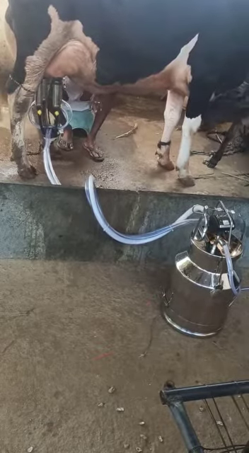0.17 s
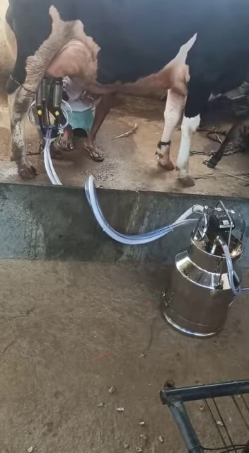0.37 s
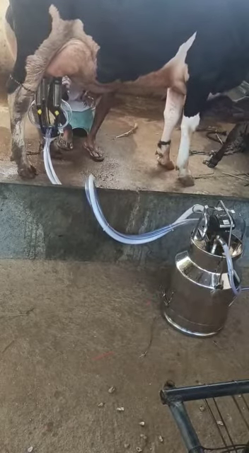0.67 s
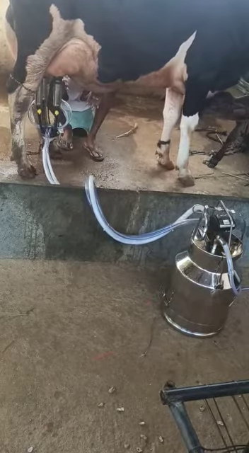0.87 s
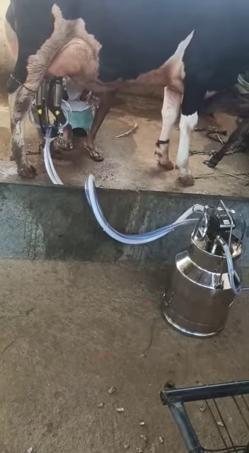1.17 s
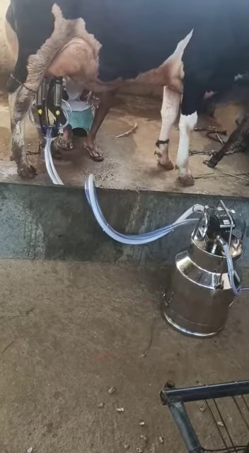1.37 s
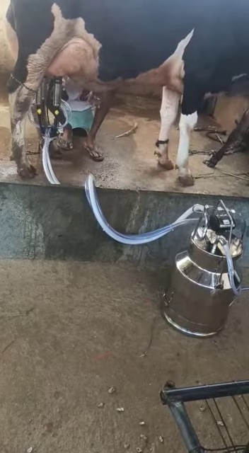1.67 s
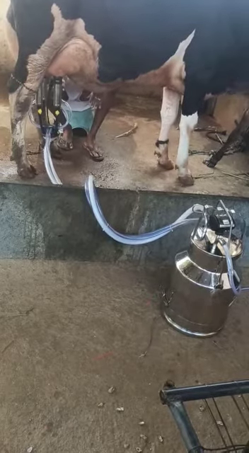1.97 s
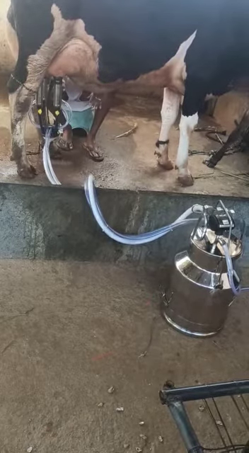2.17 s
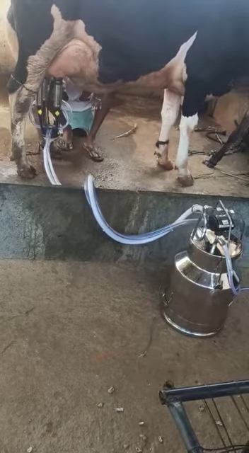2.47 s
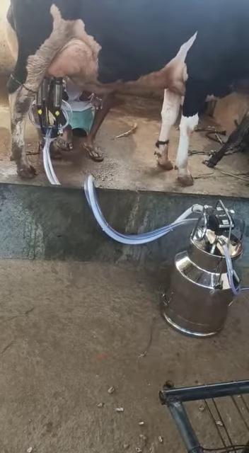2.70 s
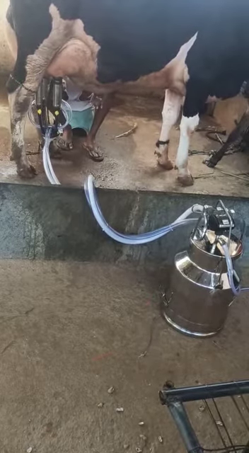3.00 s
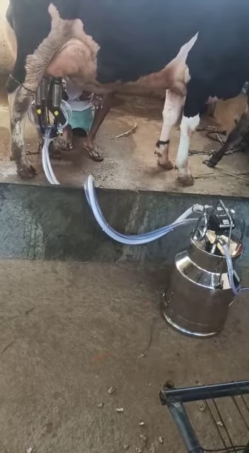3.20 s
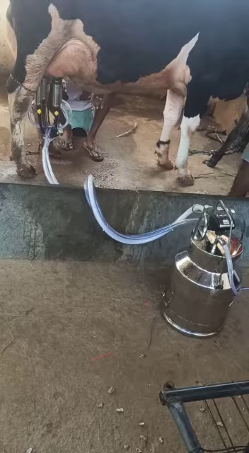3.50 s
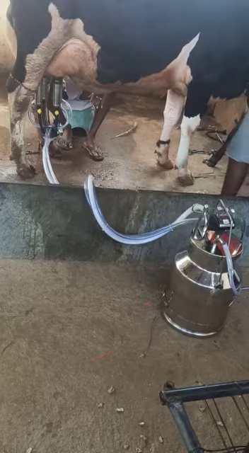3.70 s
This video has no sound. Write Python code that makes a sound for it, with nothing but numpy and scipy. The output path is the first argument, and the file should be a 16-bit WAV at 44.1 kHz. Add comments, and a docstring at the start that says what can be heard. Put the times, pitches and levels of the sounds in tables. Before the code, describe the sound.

Milking machine at work: constant vacuum pump drone, sharp alternating valve clicks, soft puffs of air.

```python
"""A barn: a milking machine works beside a cow. Its vane vacuum pump hums and buzzes at a constant speed:
tones on multiples of the shaft speed, bearing whine and a rush of noise that pulses with the vanes.
The pulsator on the bucket snaps over and back, tick and tock: shaped noise bursts and decaying sines.
Each snap lets a puff of air through the valve, and a longer hiss swells about a third of a second later.
The concrete floor throws every snap back at once, and the barn adds a short tail."""
import sys
import numpy as np
from scipy import signal
from scipy.fft import rfft, irfft, next_fast_len
from scipy.io import wavfile
from scipy.ndimage import uniform_filter1d

SR = 44100
rng = np.random.default_rng(int(sys.argv[2]) if len(sys.argv) > 2 else 0)


def wrap_up_sound(samples):
    """Save the sound to the file named by the first command line argument, as 16-bit audio."""
    columns = np.atleast_2d(samples).T
    # keep every value between -1 and 1, then stretch to whole-number steps
    tamed = np.clip(columns, -1, 1)
    steps = np.round(tamed * 32767).astype(np.int16)
    wavfile.write(sys.argv[1], SR, steps)


N = 169785
TOP_HZ = 15600  # band limit

# valve snaps over: start_s, level_db
TICKS = [(.3226, 1), (1.4736, 1.5), (2.6146, 1), (3.7656, 0.5)]
# valve snaps back: start_s, level_db
TOCKS = [(-.19, 0.0047), (.9575, 0), (2.0982, 0), (3.2497, 0.028)]
# stereo lean of noise, and mean lean of weak tones: freq_hz, left_minus_right_db
LEAN_BY_HZ = [(300, -2), (520, -1), (800, -3.5), (3000, -0.5), (8000, 0.5), (13000, -3.5)]


def amp(db):
    """Decibels to gain."""
    return 10 ** (np.asarray(db) / 20)


def unit(x):
    """Scale to rms 1."""
    return x / np.sqrt(np.mean(x ** 2) + 1e-20)


def along(points, hz):
    """Interpolate (Hz, value) points on a log-frequency axis."""
    f, v = np.transpose(points)
    return np.interp(np.log(hz + 1), np.log(f + 1), v)


def wobble(knots_per_s):
    """Random curve: straight lines between normal knots."""
    knots = rng.standard_normal(int(N * knots_per_s / SR) + 4)
    return np.interp(np.arange(N) * knots_per_s / SR, np.arange(len(knots)), knots)


def filtered(x, response):
    """Filter x by a response given as a function of Hz."""
    n = x.shape[-1]
    padded = next_fast_len(n + SR // 2)
    spectrum = rfft(x, padded) * response(np.fft.rfftfreq(padded, 1 / SR))
    return irfft(spectrum, padded)[..., :n]


def panned(lean_db):
    """Left and right gains of constant power."""
    gains = amp(np.array([lean_db, -lean_db]) / 2)
    return gains / np.sqrt(np.mean(gains ** 2, axis=0))


def pump():
    """Vane pump: tones on shaft multiples, bearing whine, and a rush pulsing with the four vanes."""
    # strong tones: shaft_multiple, base_level_db, left_minus_right_db
    orders = [(4, -31, 0), (8, -38, 6), (10, -47, -1), (11, -57, 5), (12, -36, -10), (13, -53, -12),
              (14, -55, -1), (16, -43, 2), (20, -50, 3), (28, -52, -9), (32, -56, 5), (35, -56, 1),
              (36, -45, -12), (38, -58, -2), (40, -55, -12), (42, -54, -10), (43, -55, -5), (44, -50, 6),
              (56, -47, -6), (80, -50, -4), (84, -48, 9), (86, -50, -4), (89, -46, 4), (91, -49, -1),
              (92, -46, -1), (97, -51, 2), (100, -42, 4), (111, -47, 6), (117, -50, 2), (161, -50, 7),
              (174, -51, -7)]
    # colour of the strong tones: freq_hz, gain_db
    strong_colour = [(190, -.3), (380, 0), (570, -.2), (760, -.3), (1300, -.5), (1700, -1), (2100, .5),
                     (2600, -1.5), (4300, 0), (4750, -1.5), (5300, -2), (8000, -3)]
    # mean level of the weaker tones on all other multiples: freq_hz, level_db
    buzz = [(100, -73.5), (300, -61), (700, -72), (1200, -65.5), (2200, -59), (3300, -57), (4500, -57),
            (6000, -56.5), (7000, -60.5), (8200, -61.5), (12500, -64.5), (13700, -61.5), (15500, -64)]
    # bearing whine, mostly on multiples of 230 Hz: freq_hz, level_db, left_minus_right_db
    whine = [(1609, -57, 4), (2299, -52, 6), (2472, -56, 0), (2529, -47, -7), (2989, -48, -10),
             (3132, -46, 3), (3218.5, -47, 2), (3448.5, -50, 0)]
    # rush of pump and barn: freq_hz, relative_density_db
    rush_spectrum = [(25, -29), (55, -29), (90, -8.5), (150, -1.5), (230, -3.5), (300, 5), (450, -1.5),
                     (600, -1), (780, -2.5), (900, -2.5), (1400, -7.5), (1850, -4.5), (2100, 4.5),
                     (2230, -8.5), (2380, -3.5), (2730, -1.5), (2850, -5), (3050, -1), (4600, 1.5),
                     (4900, 0.5), (6500, -3), (7000, -6.5), (7500, 2), (7900, -0.5), (8300, -1),
                     (12600, -7.5), (13600, -18), (15500, -7.5)]
    shaft_hz, drift_turns = 47.535, 0.00091
    buzz_scatter_db, lean_scatter_db = 3, 4
    rush_db, rush_patchy_db, pulse_depth = -31, 2.5, 0.11

    turns = shaft_hz * np.arange(N) / SR + drift_turns * wobble(8)
    strong = {}
    for k, db, lean in orders:
        strong[round(k)] = (db + along(strong_colour, k * shaft_hz), lean)
    out = sum(tone(hz, turns * hz / shaft_hz, db, lean) for hz, db, lean in whine)
    for k in range(2, int(TOP_HZ / shaft_hz)):
        hz = k * shaft_hz
        size, side = rng.standard_normal(2)
        weak_db = along(buzz, hz) + buzz_scatter_db * size
        weak_lean_db = along(LEAN_BY_HZ, hz) + lean_scatter_db * side
        db, lean = strong.get(k, (weak_db, weak_lean_db))
        out += tone(hz, k * turns, db, lean)
    vanes = np.cos(2 * np.pi * 4 * turns)
    pulsing = rush(rush_spectrum, rush_patchy_db) * (1 + pulse_depth * vanes)
    return out + amp(rush_db) * unit(pulsing)


def tone(hz, cycles, db, lean_db):
    """One fluttering partial, reaching the two ears with its own level and phase."""
    # random spread of the start phase: freq_hz, spread_rad
    phase_scatter = [(190, 0), (570, .05), (760, .15), (1300, 2), (2500, 3), (14000, 3)]
    # mean phase lead of the left ear: freq_hz, lead_rad
    left_lead = [(190, 0), (380, -.1), (475, -.5), (570, 2.4), (760, .7), (950, 2), (1700, 2), (2500, 1.9),
                 (3100, 1.1), (4200, 1.1), (4800, 1.6), (8000, 1.5)]
    # depth of the level flutter: freq_hz, share
    flutter = [(190, .03), (380, .16), (570, .12), (760, .1), (3000, .28), (14000, .4)]
    ear_scatter_rad = .33

    start, apart = along(phase_scatter, hz) * rng.standard_normal(2)
    lead = (along(left_lead, hz) + ear_scatter_rad * apart) * np.array([[.5], [-.5]])
    angle = (2 * np.pi * (cycles % 1) + start + lead).astype(np.float32)
    size = np.sqrt(2) * amp(db) * (1 + along(flutter, hz) * wobble(12))
    return panned(lean_db)[:, None] * size * np.cos(angle)


def rush(spectrum, patchy_db):
    """Stereo noise of rms 1, in time-frequency patches of random gain."""
    # left-right correlation: freq_hz, correlation
    alike = [(50, .85), (200, 1), (350, 0.91), (550, 0), (1000, 0), (3000, 0), (14000, 0.013)]

    z = signal.stft(rng.standard_normal((2, N)), nperseg=512)[2]
    field = uniform_filter1d(rng.standard_normal(z.shape[1:]), size=8, axis=0)
    field = uniform_filter1d(field, size=12, axis=1)
    pair = signal.istft(z * amp(patchy_db * unit(field)), nperseg=512)[1][:, :N]

    def mid_side_gains(hz):
        turn = np.arccos(np.clip(along(alike, hz), -1, 1)) / 2
        return amp(along(spectrum, hz)) * [np.cos(turn), np.sin(turn)]

    mid, side = filtered(pair, mid_side_gains)
    stereo = np.array([mid + side, mid - side])
    return unit(filtered(stereo, lambda hz: panned(along(LEAN_BY_HZ, hz))))


def snaps(events, crack, rattle, modes, crack_db, rattle_db):
    """The valve hits its stop: a crack, the housing's rattle and knock, the floor's echo and the barn."""
    crack_length_s, rattle_length_s = 0.0043, 0.043
    knock_rise_s, knock_scatter_db = .0007, 0.39
    floor_echo_s, floor_echo_db, barn_db = .0037, -10.5, -2

    out = np.zeros((2, N + 2 * SR))  # 1 s of margin at each end
    t = np.arange(SR // 2) / SR
    for start_s, db in events:
        knock = 0
        for hz, level_db, t60_s in modes:
            ring_db = level_db + rng.normal(0, knock_scatter_db) - 60 * t / t60_s
            knock = knock + amp(ring_db) * np.sin(2 * np.pi * hz * t)
        knock *= 1 - np.exp(-t / knock_rise_s)
        hit = amp(crack_db) * burst(t, crack, crack_length_s)
        hit += amp(rattle_db) * burst(t, rattle, rattle_length_s)
        hit = amp(db) * (hit + knock)
        echo = amp(floor_echo_db) * np.interp(t - floor_echo_s, t, hit, left=0)
        first = SR + round(start_s * SR)
        out[:, first:][:, :len(t)] += hit + echo + amp(barn_db) * barn(hit)
    return out[:, SR:SR + N]


def burst(t, colour, length_s):
    """Coloured noise with the energy of noise dying 60 dB in length_s; flattened so like hits sound alike."""
    rise_s = 0.00013
    onset = 1 - np.exp(-t / rise_s)
    fade = amp(-60 * t / length_s) * onset
    x = rng.standard_normal(len(t)) * fade
    for _ in range(8):  # flatten the spectrum, then window again
        z = rfft(x)
        flat = irfft(z / (abs(z) + 1e-12), len(t))
        x = flat * np.exp(-(t / length_s) ** 2) * onset
    x = causal(x, colour)
    return x * np.linalg.norm(fade) / np.linalg.norm(x)


def causal(x, colour):
    """Minimum-phase filter: a body of the given colour that answers only after it is struck."""
    n = len(x)
    cepstrum = irfft(np.log(amp(along(colour, np.fft.rfftfreq(n, 1 / SR)))), n)
    fold = np.where(np.arange(n) < n // 2, 2, 0) - (np.arange(n) == 0)
    return irfft(rfft(x) * np.exp(rfft(cepstrum * fold)), n)


def valve_air():
    """Each snap lets out a small puff, then a longer hiss swells and dies."""
    # air through the valve: freq_hz, relative_density_db
    air_spectrum = [(1000, -18), (3000, -7), (4200, 2), (5100, -4.5), (6700, 2.5), (8300, -3.5),
                    (12500, -7.5), (14000, -5.5), (15500, -6.5)]
    tick_delay_s, tock_delay_s = .368, .322  # snap to hiss peak
    hiss_db, hiss_rise_s, hiss_fall_s = -29.2, .034, .06
    puff_db, puff_rise_s, puff_fall_s = -26.5, 0.0063, .045  # level before rise and fall
    waver_db = .9

    t, power = np.arange(N) / SR, np.zeros(N)
    for events, delay_s in ((TICKS, tick_delay_s), (TOCKS, tock_delay_s)):
        for start_s, _ in events:
            from_peak = t - start_s - delay_s
            width_s = np.where(from_peak < 0, hiss_rise_s, hiss_fall_s)
            hiss = amp(hiss_db) * np.exp(-.5 * (from_peak / width_s) ** 2)
            age = np.maximum(t - start_s, 0)
            puff = amp(puff_db) * (1 - np.exp(-age / puff_rise_s)) * np.exp(-age / puff_fall_s)
            power += hiss ** 2 + puff ** 2
    return np.sqrt(power) * amp(waver_db * wobble(9.7)) * rush(air_spectrum, patchy_db=0.5)


def barn(x):
    """A diffuse tail, different at each ear, each frequency dying at its own speed."""
    # decay of the barn: freq_hz, t60_s
    decay = [(200, .3), (1000, 0.18), (4000, 0.29), (8000, 0.12), (14000, 0.1)]

    hz, t, z = signal.stft(rng.standard_normal((2, SR // 2)), SR, nperseg=256)
    tail = signal.istft(z * amp(-60 * t / along(decay, hz)[:, None]), SR, nperseg=256)[1]
    return signal.fftconvolve(x[None], tail / np.linalg.norm(tail[0]), axes=1)[:, :len(x)]


def scene():
    """Pump, pulsator and its air."""
    # colour of the impact: freq_hz, relative_db
    tick_crack = [(500, -31.5), (2300, -12.5), (3000, 2), (4300, 1.5), (5100, -17.5), (5900, -6.5),
                  (7000, -11), (8400, -11), (13000, -20), (16000, -40)]
    # same columns: freq_hz, relative_db
    tock_crack = [(500, -26), (2200, -9.5), (3600, -10.5), (4600, 5), (5600, -9), (6500, -3), (7300, -3.5),
                  (8400, -10), (13000, -22.5), (16000, -27)]
    # colour of the short rattle of the plastic housing: freq_hz, relative_db
    tick_rattle = [(700, -29.5), (1500, -21.5), (2400, -14.5), (2750, -1), (3900, -2.5), (4500, -1.5),
                   (5100, -10.5), (6500, -6), (8400, -10), (13000, -22)]
    # same columns: freq_hz, relative_db
    tock_rattle = [(700, -22), (1600, -7), (2300, -6), (2700, 3), (3300, -0.5), (3700, 1), (4300, -8),
                   (5200, -6.5), (6600, -5), (8400, -19.5), (13000, -25)]
    # hollow knock of the housing: pitch_hz, mean_level_db (before the snap's level), t60_s
    tick_modes = [(956, -22, 0.036), (1110, -29, 0.031)]
    # same columns: pitch_hz, mean_level_db, t60_s
    tock_modes = [(950, -24, 0.041), (1040, -20, 0.038)]

    ticks = snaps(TICKS, tick_crack, tick_rattle, tick_modes, crack_db=-8, rattle_db=-23.5)
    tocks = snaps(TOCKS, tock_crack, tock_rattle, tock_modes, crack_db=-9.5, rattle_db=-24)
    return pump() + valve_air() + ticks + tocks


def record(dry):
    """The treble has a steady gap and ends at the band limit."""
    # gap in the treble: freq_hz, gain_db
    treble_gap = [(8450, 0), (8850, -14), (9000, -50), (11500, -50), (11620, 0)]
    return filtered(dry, lambda hz: (hz < TOP_HZ) * amp(along(treble_gap, hz)))


dry = scene()
out = record(dry)
wrap_up_sound(out)
```